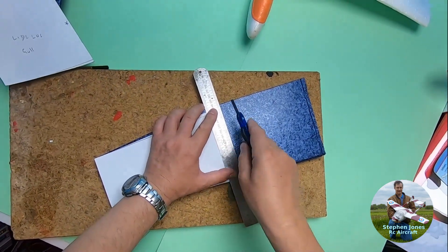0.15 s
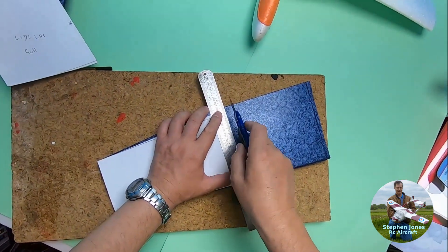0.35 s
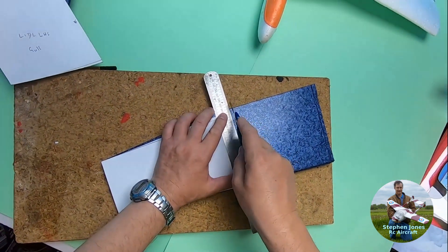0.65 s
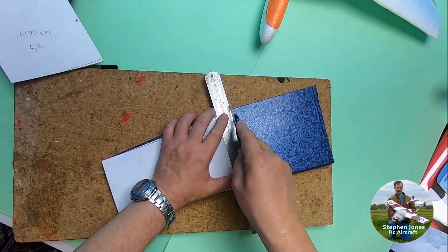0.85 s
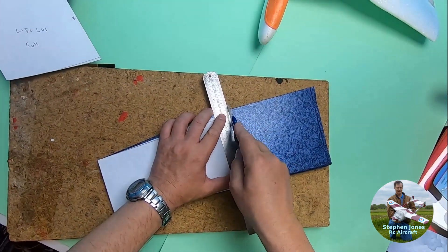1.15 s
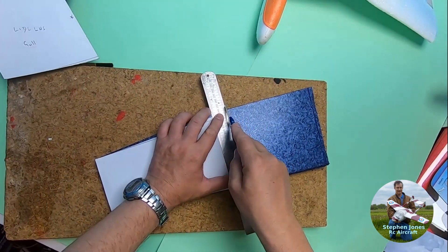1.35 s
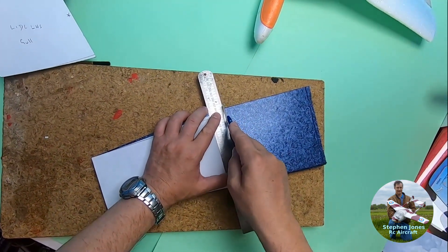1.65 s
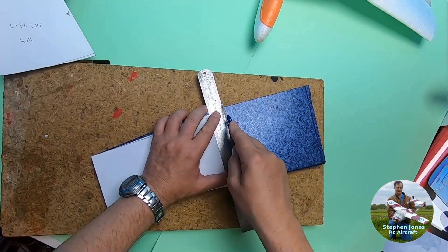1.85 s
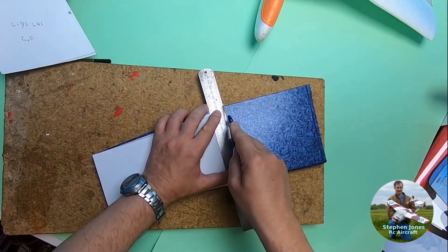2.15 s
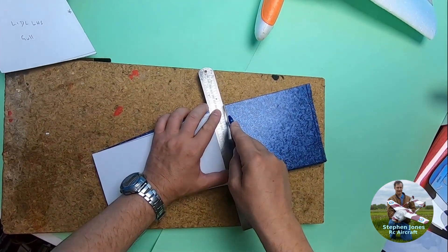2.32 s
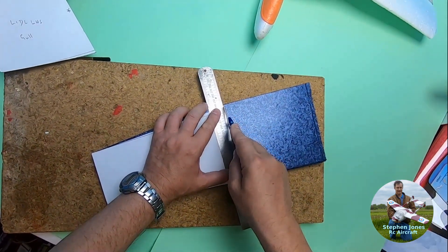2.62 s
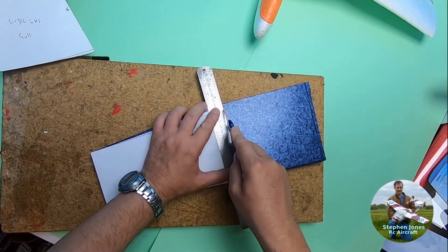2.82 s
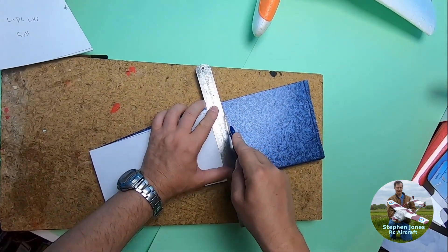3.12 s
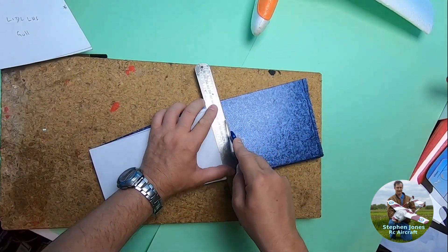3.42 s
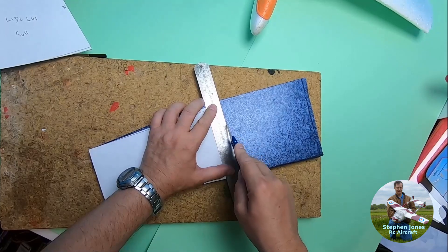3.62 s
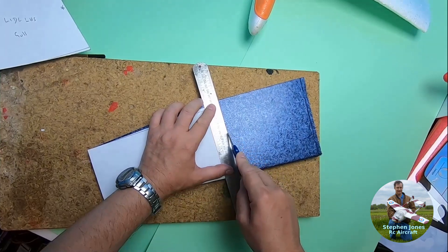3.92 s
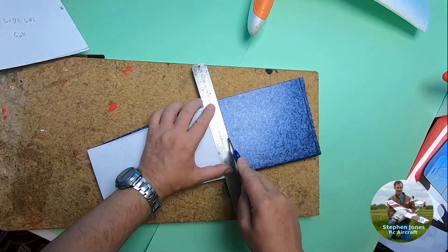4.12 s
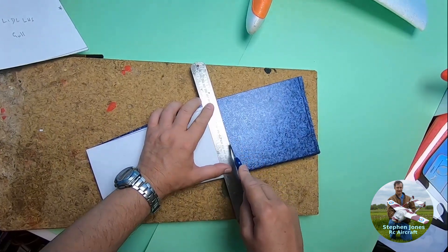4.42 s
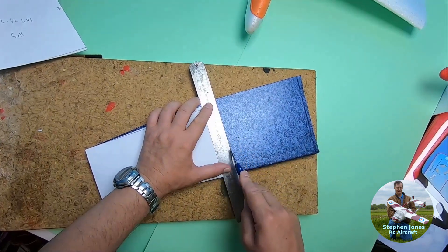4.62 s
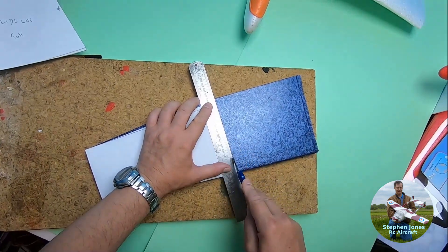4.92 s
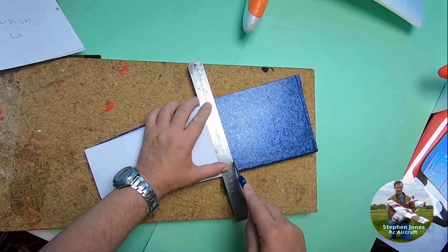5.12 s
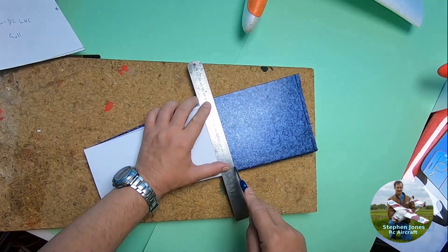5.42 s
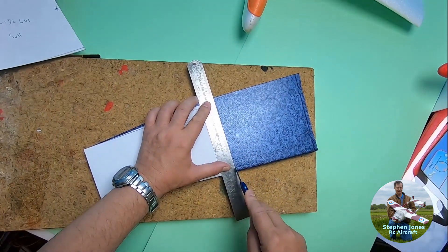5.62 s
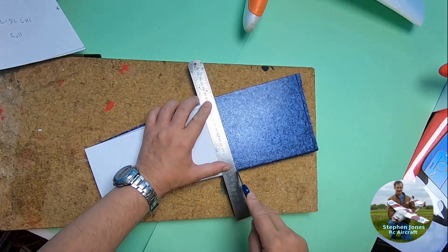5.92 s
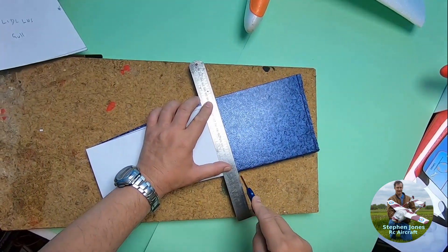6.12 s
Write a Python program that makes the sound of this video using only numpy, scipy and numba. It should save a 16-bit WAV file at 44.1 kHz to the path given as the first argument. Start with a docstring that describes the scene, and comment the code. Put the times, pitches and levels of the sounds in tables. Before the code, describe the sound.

A craft knife clicks and slides against steel, then slowly crackles through a foam sheet on a board, with snaps growing sharper toward the end.

```python
"""Craft knife cutting foam sheet.

A craft knife slides and clicks as it is readied; hands bump the board and foam squeaks under a steel ruler.
The blade grazes the sheet and is drawn slowly through: cells crackle, foam spots snap, the sheet flexes.
Filtered breaks excite sheet, knife and board; the board rings most as the blade runs out and ticks on it.
Close surfaces return the treble a few milliseconds later; scattered reflections and soft noise make a small room."""
import sys
import numpy as np
from scipy import signal
from scipy.fft import rfft, irfft, next_fast_len
from scipy.io import wavfile
from scipy.ndimage import uniform_filter1d
from numba import njit

SR = 44100
rng = np.random.default_rng(int(sys.argv[2]) if len(sys.argv) > 2 else 0)


def master(y):
    """Save y as 16-bit WAV."""
    cut = np.clip(np.atleast_2d(y).T, -1, 1)
    pcm = np.round(cut * 32767)  # scale
    wavfile.write(sys.argv[1], SR, pcm.astype(np.int16))


N = 276066
TIME = np.arange(N) / SR


def undb(db):
    """Decibels to gain."""
    return 10 ** (np.asarray(db) / 20)


def unit(x):
    """Scale to rms 1."""
    return x / np.sqrt(np.mean(x ** 2))


def at(table, s):
    """Columns of a curve table, interpolated at time s."""
    times, *columns = np.transpose(table)
    return [np.interp(s, times, c) for c in columns]


def curves(table):
    """Columns of a curve table, sample by sample."""
    return at(table, TIME)


def add(out, s, x):
    """Mix x in at time s."""
    i = int(s * SR)
    out[i:i + len(x)] += x[:N - i]


def colour(x, points, size=1024):
    """Causal minimum-phase filter of unit energy through (Hz, dB) points."""
    hz, db = np.transpose(points)
    f = np.maximum(np.fft.rfftfreq(size, 1 / SR), 1)
    cepstrum = irfft(np.log(undb(np.interp(np.log(f), np.log(hz), db))))
    # folding the cepstrum makes the response causal
    cepstrum[1:size // 2] *= 2
    cepstrum[size // 2 + 1:] = 0
    response = irfft(np.exp(rfft(cepstrum)))
    return signal.fftconvolve(x, response / np.linalg.norm(response))[:len(x)]


@njit
def svf(x, hz, width):
    """State-variable band-pass with a moving centre, gain 1 there."""
    y, band, low = np.empty(len(x)), 0., 0.
    for i in range(len(x)):
        g, k = np.tan(np.pi * hz[i] / SR), width / hz[i]
        v = (band + g * (x[i] + 1e-18 - low)) / (1 + g * (g + k))
        band, low, y[i] = 2 * v - band, low + 2 * g * v, k * v
    return y


def resonate(x, hz, width):
    """One resonance that keeps the power of a white input."""
    return svf(x, hz + np.zeros(len(x)), float(width)) * np.sqrt(SR / (np.pi * width))


def ring(x, modes):
    """A body's modes in parallel, keeping the power of a white input."""
    power = sum(w * undb(db) ** 2 for _, w, db in modes)
    return sum(resonate(x, hz, w) * undb(db) * np.sqrt(w / power) for hz, w, db in modes)


def walk(rate):
    """Slow random curve with a spread near 1."""
    k = int(SR / rate)
    held = np.repeat(rng.standard_normal(N // k + 1), k)
    return np.sqrt(2) * uniform_filter1d(uniform_filter1d(held, k), k)[:N]


def crackle(rate, spread_db):
    """Random tiny breaks at rate per second, most of them weak and a few strong; rms 1."""
    happens = rng.random(N) < rate / SR
    size = undb(spread_db * np.minimum(rng.exponential(size=N), 4))
    return unit(happens * size * rng.choice([-1, 1], N))


def burst(length, after, size=4096):
    """A sharp break and a dying shower of smaller ones; one millisecond's worth of unit power."""
    t = np.arange(size) / SR / max(length, 1 / SR)
    grains = rng.standard_normal(size) * rng.random(size) ** 4
    shower = grains * np.sqrt(t) * np.exp(-t)
    x = after * shower / np.linalg.norm(shower)
    x[0] += 1
    return x / np.linalg.norm(x) * np.sqrt(SR / 10 ** 3)


def strokes(table, swell, release_s):
    """Pressure of rubbing strokes (growing as time to the power swell), and its treble-exciting part."""
    body, treble = np.zeros(N), np.zeros(N)
    for s, length, db, edge_db in table:
        t = TIME - s
        rise = np.clip(t / length, 0, 1) ** swell
        stroke = undb(db) * rise * np.exp(-np.maximum(t - length, 0) / release_s)
        body, treble = body + stroke, treble + stroke * undb(edge_db)
    return body, treble


def spread(mid, side):
    """Mid and side to left and right."""
    return np.array([mid + side, mid - side])


# Room noise spectrum. Each row: frequency in Hz, density in dB per Hz.
AIR_SPECTRUM = [(15, -47.5), (25, -3), (75, -5.5), (188, -3.5), (227, -11), (369, -6), (538, -22),
                (785, -3), (1060, -22.5), (1340, -15), (1670, -23.5), (4170, -26), (5600, -30.5),
                (8390, -31.5), (15600, -48.5)]
# Room drone. Each row: frequency in Hz, width in Hz, level in dB.
DRONE_MODES = [(161, 28, 5.5), (189, 23, 4.5), (263, 21, -11), (730, 160, -21)]


def air():
    """Quiet room: filtered noise plus noise-driven low resonances as a drone."""
    mid, side, drone_mid, drone_side = rng.standard_normal((4, N))
    side = signal.sosfilt(signal.butter(1, 180, "high", fs=SR, output="sos"), side)
    hiss = spread(colour(mid, AIR_SPECTRUM, size=8192), 1.6 * colour(side, AIR_SPECTRUM, size=8192))
    drone = spread(ring(drone_mid, DRONE_MODES), .6 * ring(drone_side, DRONE_MODES))
    return undb(-74) * hiss + undb(-73) * drone


# Palm rub spectrum. Each row: frequency in Hz, density in dB per Hz.
PALM_SPECTRUM = [(100, -24.5), (240, -7.5), (500, -16), (1500, -19), (12000, -46.5)]
# Hollow under the palm. Each row: frequency in Hz, width in Hz, level in dB.
HOLLOW_MODES = [(304.7, 40, 4), (660, 63, -8.5)]
SETTLE_DB, SETTLE_FALL_DB_PER_S = -63.5, 50.5


def settling():
    """Hand and arm come to rest: a fading dull rub with two hollow resonances that swell and wander."""
    rub = colour(rng.standard_normal(N), PALM_SPECTRUM)
    for hz, width, db in HOLLOW_MODES:
        swell = undb(db + 3 * walk(25))
        rub = rub + swell * resonate(rng.standard_normal(N), hz * (1 + .08 * walk(20)), width)
    return rub * undb(SETTLE_DB - SETTLE_FALL_DB_PER_S * TIME)


# Blade strokes. Each row: start in seconds, length in seconds, level in dB, relative treble in dB,
# blade pitch in Hz.
BLADE_SLIDES = [(0, 0.026, -57, 0.5, 5770), (0.101, 0.038, -66, 1, 6300), (0.204, 0.026, -50, -2.5, 7650),
                (.229, 0.013, -38, 6, 7740), (0.28, 0.039, -57, -15, 7400), (0.329, 0.026, -50, -1, 4440),
                (.538, 0.0088, -59, -11, 4300), (0.573, 0.042, -68, 0, 5650),
                (0.616, 0.034, -59, 3.5, 7800), (.67, 0.11, -75.5, 2, 3360)]
# Knife body. Each row: frequency in Hz, width in Hz, level in dB.
KNIFE_MODES = [(3360, 330, 7.5), (3680, 73, 0), (4204, 70, 10), (5080, 46, -4), (6770, 140, -1),
               (8400, 90, -4), (10100, 110, -4), (11100, 160, -7)]
# Steel contact, then its bright treble. Each row: frequency in Hz, density in dB per Hz.
STEEL_SPECTRUM = [(300, -31.5), (1800, -8.5), (3000, -1.5), (4200, 5.5), (5500, -17), (9000, -32.5)]
GLINT_SPECTRUM = [(2500, -34.5), (5200, 8), (6600, 9.5), (8000, 6.5), (10400, 1.5), (12000, -12.5),
                  (15000, -31.5)]
BLADE_DB, BLADE_WIDTH_HZ = -7.5, 200
SLIDE_SWELL, SLIDE_RELEASE_S = 0.23, 0.015


def sliding():
    """Steel scrapes on steel in fine grains; each stroke makes the blade sing at its own pitch."""
    grains = crackle(rate=2200, spread_db=3) * undb(2.2 * walk(160))
    out = np.zeros(N)
    for *stroke, blade_hz in BLADE_SLIDES:
        body, _ = strokes([stroke], SLIDE_SWELL, SLIDE_RELEASE_S)
        out += undb(BLADE_DB) * resonate(grains * body, blade_hz, BLADE_WIDTH_HZ)
    body, treble = strokes([row[:-1] for row in BLADE_SLIDES], SLIDE_SWELL, SLIDE_RELEASE_S)
    out += undb(-5) * colour(grains * body, STEEL_SPECTRUM)
    out += undb(-9.5) * ring(grains * body, KNIFE_MODES)
    return out + undb(-3) * colour(grains * treble, GLINT_SPECTRUM)


# Slider and blade clicks. Each row: start in seconds, level in dB, relative treble in dB,
# relative handle ring in dB, handle pitch in Hz, rattle decay in seconds, blade pitch in Hz.
KNIFE_CLICKS = [(0.121, -44, -10, -8, 3370, 0.0061, 7600), (.208, -46.5, -16, 0, 3500, 0.0016, 7700),
                (0.236, -23.5, 1, 3.5, 3030, 0.0023, 7740), (0.247, -33, 1, -15, 3000, 0.0052, 7850),
                (.289, -50, -13, -5, 3200, 0.0022, 4500), (0.311, -46.5, -3, 13, 3140, 0.0017, 8300),
                (0.3437, -42.5, -8, 14, 3180, 0.002, 9200), (.358, -54, -16, 12, 3060, 0.0039, 4130),
                (.385, -47.5, 6.5, -7, 3150, 0.0022, 7200), (.548, -57.5, -8, -7, 3300, .002, 7500),
                (0.676, -50, -4, 2.5, 3160, 0.0031, 3750)]


def knife():
    """The slider drops into its notches and pings the handle; the blade rattles, ringing anew each time."""
    out = np.zeros(N)
    for s, db, edge_db, handle_db, hz, length, blade_hz in KNIFE_CLICKS:
        rattle = burst(length, after=1.3) * undb(db)
        tap = burst(length, after=0) * undb(db + handle_db - 12.5)
        click = resonate(resonate(tap, hz, 360), hz, 600)
        click += undb(BLADE_DB) * resonate(rattle, blade_hz, BLADE_WIDTH_HZ)
        click += ring(rattle, KNIFE_MODES)
        click += undb(-7) * colour(rattle, STEEL_SPECTRUM)
        click += undb(edge_db + 1.5) * colour(rattle, GLINT_SPECTRUM)
        add(out, s, click)
    return out


# Hand presses on the board. Each row: start in seconds, thud level in dB, thud pitch in Hz,
# knock level in dB, hollow body level in dB.
HAND_BUMPS = [(0.889, -31, 57.4, -54.5, -41.5), (1.539, -32, 48.6, -53.5, -78)]
# Board scuff spectrum. Each row: frequency in Hz, density in dB per Hz.
KNOCK_SPECTRUM = [(80, -7.5), (200, -1.5), (350, -6.5), (550, -9.5), (1300, -11.5), (2000, -7),
                  (3000, -17.5), (7000, -34.5), (14000, -54.5)]


def bumps(size=8192):
    """The board sinks against the table: a soft sine thud, a two-tone hollow knock and a noise scuff."""
    thuds, knocks, t = np.zeros(N), np.zeros(N), np.arange(size) / SR
    hollow = np.exp(-t / 0.0065) * (np.sin(2 * np.pi * 290 * t) + np.sin(2 * np.pi * 370 * t)) / 2
    for s, thud_db, hz, knock_db, body_db in HAND_BUMPS:
        swell = t / 0.013 * np.exp(1 - t / 0.01)
        add(thuds, s, undb(thud_db - 9.5) * swell * np.sin(2 * np.pi * hz * t))
        scuff = undb(knock_db) * rng.standard_normal(size) * np.exp(-t / 0.022)
        add(knocks, s, colour(scuff, KNOCK_SPECTRUM))
        add(knocks, s, undb(body_db) * hollow)
    return thuds, knocks


# Scuffs on foam: ruler and fingers, then the blade's first light grazes.
# Each row: start in seconds, length in seconds, level in dB, relative treble in dB.
FOAM_SCUFFS = [(.975, 0.034, -58.5, -28), (1.062, 0.024, -59, -5.5), (1.084, 0.015, -52.5, 1),
               (1.122, 0.028, -51.5, -16.5), (1.272, 0.0089, -66, 0.5), (1.89, 0.056, -69.5, -19),
               (2.21, 0.033, -65.5, -10), (2.3, 0.07, -64, -11), (2.61, 0.057, -65.5, -8)]
# Foam rub, then edge hiss. Each row: frequency in Hz, density in dB per Hz.
RUB_SPECTRUM = [(300, 1.5), (600, -4), (1100, 1.5), (1850, 0.5), (2500, 2), (3400, 1), (4600, -5),
                (8000, -27)]
EDGE_SPECTRUM = [(2500, -34), (5200, 9.5), (6600, 10), (8000, 7.5), (10200, 3), (12000, -9.5),
                 (14000, -13.5), (15500, -33.5)]
SCUFF_SWELL, SCUFF_RELEASE_S = 0.38, 0.019


def scuffing():
    """Ruler, fingers and grazing blade rub over the foam: fine grains with a rasp whose pitch wanders."""
    body, treble = strokes(FOAM_SCUFFS, SCUFF_SWELL, SCUFF_RELEASE_S)
    grains = crackle(rate=1800, spread_db=2.4) * undb(2 * walk(90))
    rasp = resonate(grains * body, 1850 * (1 + .1 * walk(30)), 300)
    rub = undb(-9) * colour(grains * body, RUB_SPECTRUM)
    return rub + undb(-16.5) * rasp + undb(-3) * colour(grains * treble, EDGE_SPECTRUM)


# Foam stick-slip. Each row: start in seconds, length in seconds, mean pitch in Hz, level in dB.
FOAM_SQUEAKS = [(1.067, 0.018, 1970, -60), (1.078, 0.0093, 3670, -59), (1.094, 0.02, 3225, -54),
                (1.096, 0.032, 1787, -61), (1.13, 0.021, 3890, -62)]
SQUEAK_WAVER = .045  # share of pitch


def squeaking():
    """Foam sticks and slips under the ruler: brief wavering sines."""
    out, waver = np.zeros(N), 1 + SQUEAK_WAVER * walk(900)
    for s, length, hz, db in FOAM_SQUEAKS:
        pitch = hz * waver[(TIME >= s) & (TIME < s + length)]
        tone = np.sin(2 * np.pi * np.cumsum(pitch) / SR)
        add(out, s, undb(db) * np.sqrt(2) * signal.windows.tukey(len(pitch), .5) * tone)
    return out


# Blade contact curve. Each row: time in seconds, sheet resonance in Hz, bearing on board in dB,
# relative edge hiss in dB.
BLADE_CONTACT = [(2.7, 2510, -12, -5), (3.1, 2450, -14, -11.5), (3.8, 2100, -10, -6),
                 (4.15, 2050, -9, -7.5), (4.55, 2530, -10, -5), (5.1, 2850, -6, -9), (5.55, 2600, 7, -6.5),
                 (6.2, 2600, 0, -2.5)]


def on_board():
    """Power-preserving split of the blade's force between sheet and board."""
    bearing = undb(curves(BLADE_CONTACT)[1])
    sheet = 1 / np.hypot(1, bearing)
    return sheet, bearing * sheet


# Drag curve before stalls: graze, bite, draw, run-out, board scrape. Each row: time in seconds, level in dB.
BLADE_DRAG = [(2.19, -89), (2.28, -81), (2.5, -76.5), (2.805, -78), (2.84, -66), (2.888, -67.5), (2.9, -59),
              (3.07, -56), (3.21, -50), (3.29, -56), (3.41, -53.5), (3.52, -60.5), (3.72, -54), (4.88, -55),
              (5.33, -50.5), (5.48, -58), (5.81, -57), (5.885, -78), (5.98, -56), (6.08, -63.5),
              (6.125, -49.5), (6.26, -56.5)]
# Typed snaps: foam giving way, then ticks of the blade scraping the board.
# Each row: start in seconds, level in dB, relative treble in dB, shower to break ratio.
TYPED_SNAPS = [(3.1912, -40, -2, 1.4), (3.209, -49, 8, .3), (3.2398, -38, 2.5, 0.45),
               (3.3196, -37, -0.5, 0.29), (3.373, -46, 3.5, .2), (3.47, -44.5, 0, 0.23),
               (3.573, -45, -8, 0.38), (3.6084, -40.5, -2.5, 0.3), (3.703, -40.5, -1, 1.1),
               (3.735, -39.5, -8, 1.3), (3.763, -31.5, -1, 0.39), (3.8365, -37.5, -3, 1.8),
               (4.0477, -39, -4, 1.6), (4.1381, -32, -1, 3.4), (4.1586, -34, 5, 0.96),
               (4.2036, -44, 8, 0.77), (4.2695, -34.5, 4, 6.7), (4.2918, -32, 4, 4), (4.322, -38.5, 3, 3.5),
               (4.3899, -36.5, 8.5, 2.5), (4.4921, -29, 6.5, 0.99), (4.545, -39, 1, 1.7),
               (4.6361, -39, 5.5, 1.9), (4.679, -38.5, 4.5, 1.7), (4.7042, -35, 1, 0.59),
               (4.7817, -38.5, 0.5, 1.6), (4.801, -44, 8, 1), (4.919, -42.5, 6.5, 2),
               (4.9683, -30.5, -2.5, 1), (5.0034, -29, -28, 0.42), (5.094, -36.5, -18, 3),
               (5.128, -42, -7, 0.53), (5.1781, -28, -1.5, 0.49), (5.2248, -30.5, -5, 0.38),
               (5.257, -37.5, 0.5, 0.57), (5.285, -39, -17, .3), (5.37, -36, -4, 0.36),
               (5.3839, -26.5, -10.5, 1), (5.417, -37.5, -13, 0.32), (5.4825, -36, -23, 0.96),
               (5.529, -33.5, -7, 2.8), (5.6866, -34, -22, 2.1), (5.7638, -26, -5, 1.4),
               (5.9655, -42, 2, 1.8), (5.979, -46, 7, 0.71), (5.9983, -39, -10, 1.5),
               (6.0265, -39.5, -1, 0.94), (6.1142, -32.5, 3.5, 1), (6.134, -38, -3, 1.3),
               (6.158, -31, 1, 0.92), (6.197, -21, 2.5, 1.6)]
STALL_ABOVE_DB, STALL_SHARE, STALL_LEAD_S, STALL_WIDTH_S = 24, 0.81, 0.018, 0.045


def stalls():
    """Drag dip in dB, a share of the excess, as the blade is caught before snaps far above the drag."""
    dip = np.zeros(N)
    for s, db, _, _ in TYPED_SNAPS:
        excess = max(db - at(BLADE_DRAG, s)[0] - STALL_ABOVE_DB, 0)
        shape = np.exp(-((TIME - s + STALL_LEAD_S) / STALL_WIDTH_S) ** 2)
        dip += STALL_SHARE * excess * shape * (TIME < s)
    return dip


# Tearing foam spectrum. Each row: frequency in Hz, density in dB per Hz.
TEAR_SPECTRUM = [(150, -27.5), (350, -2), (550, -16), (800, -7.5), (1300, -1.5), (2500, -1.5), (3800, 0),
                 (5200, -9), (8000, -26.5), (15000, -41.5)]


def cutting():
    """Cells burst under the blade and shake the sheet, whose resonance moves along the cut; the edge hisses."""
    drag = undb(curves(BLADE_DRAG)[0] - stalls() + .7 * walk(90))
    sheet_hz, _, edge_db = curves(BLADE_CONTACT)
    cells = crackle(rate=2200, spread_db=4) * drag
    # thicker cell walls break one by one, each a short pop at its own pitch
    ticks = crackle(rate=150, spread_db=1.6) * drag
    pop_hz = sheet_hz * (1.05 + .1 * walk(120))
    pops = undb(-12) * resonate(resonate(ticks, pop_hz, 900), pop_hz, 1800)
    sheet = undb(-12) * resonate(cells, sheet_hz, 800) + undb(-7.5) * colour(cells, TEAR_SPECTRUM)
    grit = crackle(rate=2800, spread_db=2.5) * drag
    edge = colour(grit + 0.5 * ticks, EDGE_SPECTRUM) * undb(edge_db - 3)
    return (sheet + pops) * on_board()[0] + edge, cells + ticks


BITE_S, EXIT_S, WEAK_SNAPS_PER_S = 3.0, 5.7, 13
WEAK_ABOVE_DB, WEAK_GROWTH_DB_PER_S, WEAK_SCATTER_DB = 2.5, 3, 3.5
WEAK_TREBLE_DB, WEAK_TEAR_RATIO = 9.5, 0.33


def weak_snaps(count=50):
    """Random small tough spots, following the drag and growing towards the free edge; rows as TYPED_SNAPS."""
    gap, strength, tear = rng.random((count, 3)).T
    s = BITE_S + np.cumsum(2 * gap) / WEAK_SNAPS_PER_S
    db = at(BLADE_DRAG, s)[0] + WEAK_ABOVE_DB + WEAK_GROWTH_DB_PER_S * (s - BITE_S)
    db = db + WEAK_SCATTER_DB * (2 * strength - 1)
    rows = zip(s, db, at(BLADE_CONTACT, s)[2] + WEAK_TREBLE_DB, 2 * tear * WEAK_TEAR_RATIO)
    return [row for row in rows if row[0] < EXIT_S]


BEND_SLOWNESS = .36  # seconds times root hertz


def bend(x):
    """Bending waves cross the sheet, the high ones faster."""
    size = next_fast_len(len(x))
    f = np.fft.rfftfreq(size, 1 / SR)
    return irfft(rfft(x, size) * np.exp(-2j * np.pi * BEND_SLOWNESS * np.sqrt(f)), size)[:len(x)]


SNAP_PITCH_RATIO = 0.93  # to sheet resonance
BREAK_S, TEAR_S = 0.0009, 0.0015  # shower decay: base, and added per unit of shower ratio
BEND_HZ, BEND_WIDTH_HZ, BEND_DB = 1930, 15000, -14


def snapping():
    """Foam spots give way, and the blade ticks on the board: bursts with bending-wave falling chirps."""
    body, treble, push = np.zeros((3, N))
    for s, db, edge_db, tear in TYPED_SNAPS + weak_snaps():
        hz = SNAP_PITCH_RATIO * at(BLADE_CONTACT, s)[0]
        x = burst(BREAK_S + TEAR_S * tear, after=tear) * undb(db)
        pop = undb(-11.5) * resonate(resonate(x, hz, 1900), hz, 1870)
        add(body, s, pop + undb(-9.5) * colour(x, TEAR_SPECTRUM))
        add(treble, s, undb(edge_db - 8) * colour(x, EDGE_SPECTRUM))
        add(push, s, x)
    chirps = undb(BEND_DB) * colour(resonate(bend(push), BEND_HZ, BEND_WIDTH_HZ), TEAR_SPECTRUM)
    return (body + chirps) * on_board()[0] + treble, push


# Sheet releases. Each row: time in seconds, relative level in dB.
SHEET_FLEXES = [(4.253, -50.5), (4.972, -48.5), (5.203, -64), (5.243, -62), (5.386, -50.5), (5.544, -52.5),
                (5.805, -50), (6.2, -49.5)]


def flexing():
    """The whole sheet springs back as the blade lets go: a short, light, falling 'tup' of bending waves."""
    out = np.zeros(N)
    for s, db in SHEET_FLEXES:
        release = burst(.0035, after=1.)
        # early start offsets the bending delay
        add(out, s - .004, bend(release) * undb(db + 8))
    return colour(out, [(60, -28), (150, 3.5), (380, 4), (550, -1.5), (800, 5.5),
                        (1300, -2), (2500, 0.5), (6000, -59)])


# Reflection width curve. Each row: frequency in Hz, side relative to mid in dB.
REFLECTION_WIDTH = [(150, -2), (650, 6), (1400, 2.5), (3000, -6.5), (5200, -2), (9000, -11.5)]


def diffuse(near_db, tail_db, side_db, near_s, t60, size=16384):
    """One stereo pattern of scattered reflections: a close cluster, then the room's tail."""
    t = np.arange(size) / SR
    mid, side = rng.standard_normal((2, size))
    side = irfft(rfft(side) * undb(side_db + at(REFLECTION_WIDTH, np.fft.rfftfreq(size, 1 / SR))[0]))
    near = (t > .003) * np.exp(-t / near_s)
    tail = (t > .007) * undb(-60 * t / t60)
    near = undb(near_db) * near / np.linalg.norm(near)
    tail = undb(tail_db) * tail / np.linalg.norm(tail)
    return (near + tail) * spread(mid, side)


# Board and ruler. Each row: frequency in Hz, width in Hz, level in dB.
BOARD_MODES = [(785, 70, -2), (1440, 80, 9.5), (2005, 60, 10), (2220, 50, 4), (2500, 70, 4), (2850, 110, 2),
               (3390, 100, 1), (3890, 55, -1)]


def board_ringing(cells, push):
    """Breaks drive board and ruler modes through the blade's bearing; mostly direct, some scatter."""
    board = ring((undb(-6) * cells + undb(-4.5) * push) * on_board()[1], BOARD_MODES)
    scatter = diffuse(-18, -13, 3, near_s=0.0016, t60=0.16)
    return board + signal.oaconvolve(board[None], scatter, axes=1)[:, :N]


# Table and near surfaces. Each row: delay in ms, level in dB, right lag behind left in ms.
NEAR_ECHOES = [(2.751, -7, -0.13), (5.1, -9, 0.037)]
HIDDEN_S, SHADE_HZ = 5.9, 5200


def room(x, near_db, tail_db, side_db, count, size=1024):
    """The hand shades the direct treble; near surfaces return it; the scatter changes as the hands move."""
    f = np.fft.rfftfreq(size, 1 / SR)
    # past the sheet's edge the hand hides the blade, and only the echoes stay bright
    hidden = x * (TIME > HIDDEN_S)
    direct = x - hidden + signal.sosfilt(signal.butter(2, SHADE_HZ, fs=SR, output="sos"), hidden)
    out = signal.oaconvolve(direct, irfft(1 / (1 + 1j * f / SHADE_HZ)))[:N]
    for ms, db, lag_ms in NEAR_ECHOES:
        delay = (ms + np.array([[-lag_ms], [lag_ms]]) / 2) / 10 ** 3
        # small surfaces reflect short waves best
        path = undb(db) * np.exp(-2j * np.pi * f * delay) * f / (f + 3000)
        out = out + signal.oaconvolve(x[None], irfft(path), axes=1)[:, :N]
    # crossfade through count + 1 scatter patterns
    for k in range(count + 1):
        share = np.sqrt(np.maximum(1 - abs(TIME / TIME[-1] * count - k), 0))
        now = np.flatnonzero(share)
        pattern = diffuse(near_db, tail_db, side_db, near_s=0.0016, t60=0.15)
        for channel, response in zip(out, pattern):
            add(channel, TIME[now[0]], signal.fftconvolve(x[now] * share[now], response))
    return out


def scene():
    """Sum of cut, board, handling and air; thuds reach the microphone through its stand, without the room."""
    tear, cells = cutting()
    snaps, push = snapping()
    thuds, knocks = bumps()
    board = board_ringing(cells, push)
    cut = room(tear + snaps + flexing() + knocks, near_db=-4, tail_db=-8, side_db=-0.5, count=28)
    hands = knife() + sliding() + scuffing() + settling() + squeaking()
    handling = room(hands, near_db=-8, tail_db=-11.5, side_db=1.5, count=11)
    return cut + board + handling + thuds + air()


TOP_HZ = 15200


def record(dry):
    """The right port is a little more sensitive; a steep low-pass cuts the top."""
    ports = undb(np.array([[-1], [1]]) * 0.32)
    return signal.sosfilt(signal.ellip(8, .2, 70, TOP_HZ, fs=SR, output="sos"), dry * ports)


dry = scene()
out = record(dry)
master(out)
```